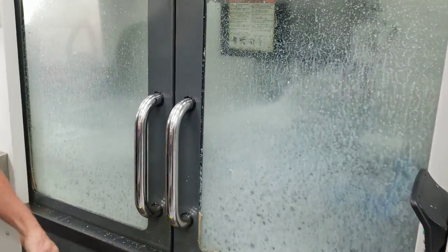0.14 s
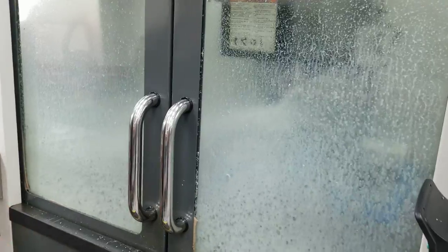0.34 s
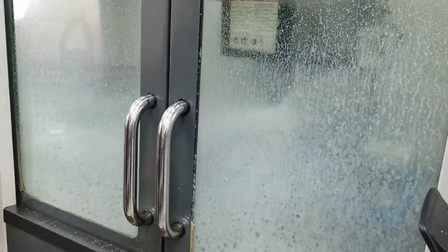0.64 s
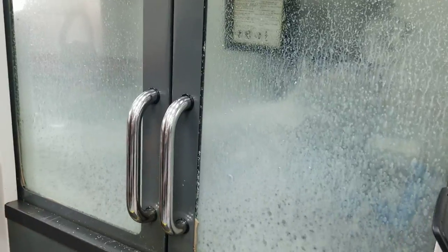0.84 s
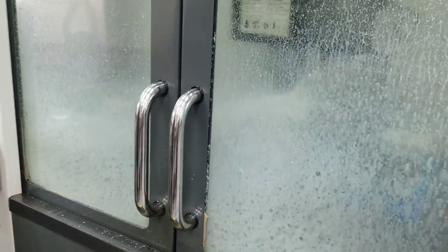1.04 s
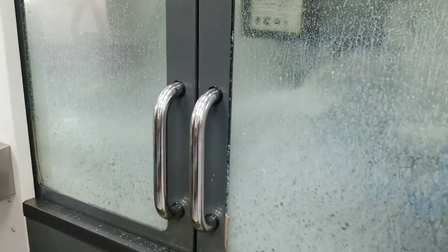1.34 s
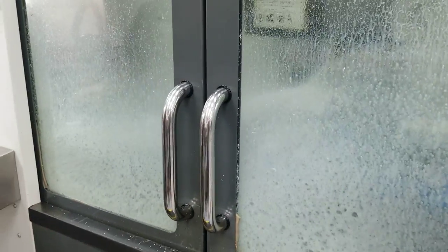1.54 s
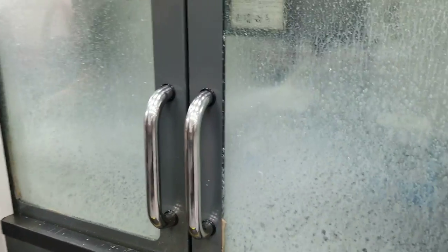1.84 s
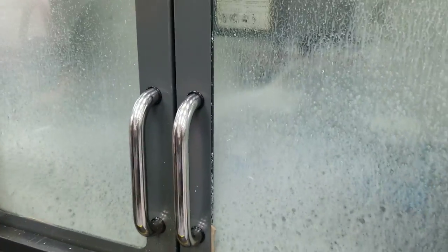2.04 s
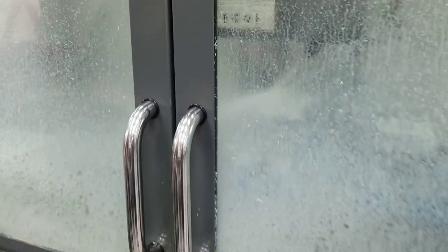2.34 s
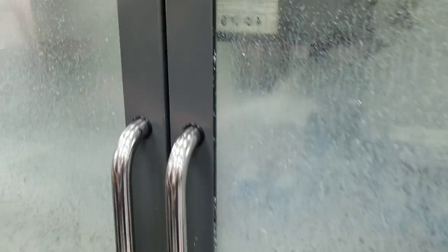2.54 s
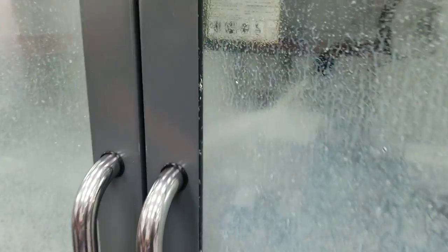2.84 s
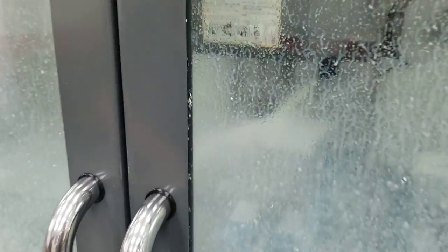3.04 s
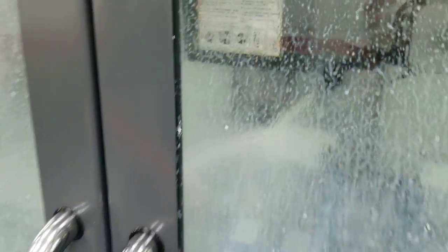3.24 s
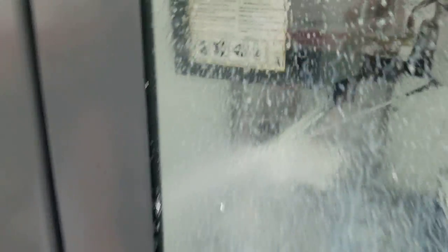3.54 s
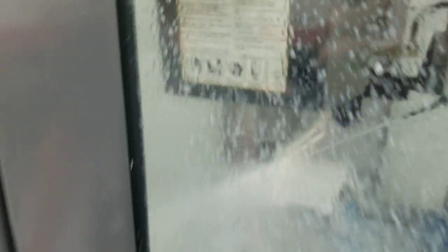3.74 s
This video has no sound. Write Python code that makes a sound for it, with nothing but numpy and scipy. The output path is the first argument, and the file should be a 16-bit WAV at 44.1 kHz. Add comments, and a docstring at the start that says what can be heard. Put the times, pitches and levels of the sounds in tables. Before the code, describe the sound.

A milling cutter whines shrilly on metal, eases, then bites again under hissing coolant spray

```python
"""A five-flute cutter mills metal at about 8000 rpm in a machining centre, under a pump hum.
At first tooth strikes make tool and stock whine, with a buzz and a rasp from run-out and unequal teeth.
Coolant, made of shaped noise, washes and hisses throughout; a feed drive tone swells around 1 s.
From about 1.3 s the cut eases. After 2.5 s it bites again, hum and hiss rise, and the buzz sinks.
Cutting tones are sines locked to the spindle; pump and feed drive tones keep their own pitch."""
import sys
import numpy as np
from scipy import signal
from scipy.fft import rfft, irfft
from scipy.io import wavfile
from scipy.ndimage import uniform_filter1d, minimum_filter1d

SR = 44100
rng = np.random.default_rng(int(sys.argv[2]) if len(sys.argv) > 2 else 0)


def master_out(mix):
    """Clip the mix to full scale and print it as 16-bit PCM to the path in sys.argv[1]."""
    frames = np.transpose(np.atleast_2d(mix))
    ceiling = np.clip(frames, -1, 1)
    pcm = np.round(ceiling * 32767).astype(np.int16)
    wavfile.write(sys.argv[1], SR, pcm)


N = 171990  # length in samples, 3.9 s

SPINDLE_HZ, FLUTES = 133.4, 5  # mean turns a second; teeth on the cutter


def undb(db):
    """Turn decibels into a gain."""
    return 10 ** (np.asarray(db) / 20)


def curve(rows, axis=1):
    """Join one column of a time table with straight lines."""
    rows = np.array(rows, float)
    return np.interp(np.arange(N) / SR, rows[:, 0], rows[:, axis])


def colour(rows, hz):
    """Read the gain at any frequency from a table of frequencies and levels."""
    rows = np.array(rows, float)
    log_hz = np.log(np.maximum(hz, 1))
    return undb(np.interp(log_hz, np.log(rows[:, 0]), rows[:, 1]))


def shaped(noise, rows):
    """Filter noise to a spectrum, then bring it to an RMS of 1."""
    hz = np.arange(N // 2 + 1) * SR / N
    filtered = irfft(rfft(noise) * colour(rows, hz), N)
    return filtered / np.std(filtered)


def wander(rate):
    """Drift smoothly between random values, `rate` of them a second, with a spread of 1."""
    steps = rng.standard_normal(2048)
    drift = np.interp(np.arange(N) / SR * rate, np.arange(len(steps)), steps)
    drift = uniform_filter1d(drift, max(int(SR / rate / 2), 1))
    return (drift - drift.mean()) / drift.std()


def partial(angle, swell_db, swell_rate, flutter):
    """A sine, RMS 1 before its swell, with slow level drift [dB] and quick phase flutter [radians]."""
    swell = undb(swell_db * wander(swell_rate))
    return np.sqrt(2) * swell * np.cos(angle + flutter * wander(70))


# Whine on the 4th, 5th and 6th tooth harmonics: (time [s], level [dB])
WHINE_4TH = [(0.0, -16), (0.13, -15), (0.21, -23), (0.48, -14.5), (1.02, -20), (1.09, -10.5), (1.17, -10),
             (1.29, -36.5), (2.24, -35.5), (2.55, -11.5), (2.7, -23), (2.88, -14), (3.21, -17), (3.49, -13),
             (3.79, -17.5), (3.86, -26)]
WHINE_5TH = [(0.0, -16.5), (0.21, -7.5), (0.35, -12), (0.42, -26.5), (0.48, -16), (0.73, -33), (1.26, -22),
             (1.37, -32), (2.41, -34.5), (2.74, -25.5), (3.18, -21), (3.25, -30), (3.4, -17), (3.53, -20),
             (3.57, -11), (3.74, -11), (3.85, -28.5)]
WHINE_6TH = [(0.0, -28.5), (0.56, -17), (1.18, -20), (1.25, -35), (2.13, -41), (2.73, -25), (2.9, -33),
             (3.24, -15), (3.29, -26), (3.37, -13), (3.73, -20), (3.9, -27)]
# Higher tooth harmonics: (multiple of the tooth rate, level before the bite is added [dB])
HIGH_HARMONICS = [(7, -33), (8, -34), (9, -44.5), (10, -45.5), (11, -48), (12, -53), (13, -54)]
# How hard the edges bite, for the higher harmonics and the rasp: (time [s], level change [dB])
BITE_LEVEL = [(0, 1), (1.18, -2.5), (1.32, -9.5), (2.3, -11.5), (3.15, 5.5), (3.35, 1), (3.7, 2.5),
              (3.9, -9)]


def whine(turn, lag):
    """Tooth strikes ring the tool strongly on three harmonics; the higher ones follow the bite."""
    out = 0
    for k, rows in enumerate((WHINE_4TH, WHINE_5TH, WHINE_6TH), 4):
        line = k * FLUTES
        tone = partial(line * turn + lag[line], swell_db=1.37, swell_rate=30, flutter=0.056)
        out = out + undb(curve(rows)) * tone
    bite = undb(curve(BITE_LEVEL))
    for k, db in HIGH_HARMONICS:
        line = k * FLUTES
        tone = partial(line * turn + lag[line], swell_db=3, swell_rate=8, flutter=.15)
        out = out + bite * undb(db) * tone
    return out


# Rasp between tooth harmonics: (frequency [Hz], level of a line before bite and overall cut [dB])
RASP_SPECTRUM = [(2500, -32.5), (3450, -33), (4400, -33.5), (6200, -48.5), (7600, -53.5), (9000, -71)]


def rasp(turn, lag):
    """Unequal teeth add lines at multiples of the spindle rate, which come and go as the cut moves on."""
    out = 0
    for k in range(19, 67):
        if k % FLUTES:  # leave out the tooth harmonics
            tone = partial(k * turn + lag[k], swell_db=4, swell_rate=6, flutter=0.33)
            out = out + colour(RASP_SPECTRUM, k * SPINDLE_HZ) * tone
    return out * undb(curve(BITE_LEVEL) - 6.0)


# Lines that flare up for a moment:
# (middle [s], multiple of the spindle rate, length at half height [s], level at the middle [dB])
FLARES = [(.03, 8, 0.5, -28), (.15, 3, 0.62, -31.5), (0.216, 15, 0.18, -29), (.56, 28, 0.37, -33),
          (.6, 33, .5, -33.5), (0.627, 26, 0.26, -24.5), (.72, 55, .25, -42.5), (.82, 29, 0.33, -22),
          (0.97, 24, 0.16, -22), (0.99, 26, 0.15, -24), (0.998, 50, 0.43, -47), (1.05, 4, 1.45, -31),
          (1.066, 45, 0.096, -39), (1.076, 15, 0.14, -30), (1.14, 60, .12, -44), (1.16, 23, 0.1, -25.5),
          (1.22, 55, .16, -39.5), (1.363, 21, 0.126, -28), (1.723, 21, 0.54, -30), (2.15, 6, 0.66, -37),
          (3.13, 59, 0.18, -38.5), (3.15, 22, 0.12, -28), (3.158, 23, .14, -29), (3.144, 35, 0.27, -26),
          (3.558, 15, 0.099, -31.5), (3.656, 45, 0.18, -31), (3.67, 55, 0.21, -34), (3.82, 31, 0.13, -23.5)]


def side_tones(turn, lag):
    """Single lines flare up as the stock rings: rough beside the whine, a bright squeal above it."""
    t = np.arange(N) / SR
    out = 0
    for middle, k, length, db in FLARES:
        flare = undb(db) / (1 + (2 * (t - middle) / length) ** 4)
        angle = k * turn + lag[k] + np.pi / 2
        out = out + flare * partial(angle, swell_db=2, swell_rate=12.53, flutter=0.14)
    return out


# Drone at the tooth rate, and at its octave: (time [s], level [dB])
TOOTH_DRONE = [(.4, -26.5), (.75, -37.5), (1.2, -24.5), (2.1, -36.5), (2.6, -45), (3.1, -39.5)]
TOOTH_OCTAVE = [(0, -24.5), (1.08, -28), (1.33, -46), (1.5, -33.5), (2.05, -35.5), (2.4, -32.5), (2.8, -39)]
# Buzz of stock and fixture: (multiple of the spindle rate, level before the time curve is added [dB])
BUZZ_LINES = [(1, -40.5), (3, -35), (4, -33.5), (6, -34), (7, -37), (8, -39), (9, -40), (11, -43),
              (13, -38), (15, -36.5), (16, -42.5)]
# Buzz over time: (time [s], level change below the split [dB], level change from the split up [dB])
BUZZ_OVER_TIME = [(0, 0, 2.5), (.7, -3.5, -1), (1.3, -2, -2), (1.8, -2, -0.5), (2.8, -9.5, -9),
                  (3.9, -16, -19)]
BUZZ_SPLIT_HZ = 1000


def buzz(turn, lag):
    """The teeth drone, and the longest one knocks the stock once a turn."""
    low = undb(curve(BUZZ_OVER_TIME, axis=1))
    high = undb(curve(BUZZ_OVER_TIME, axis=2))
    out = 0
    for k, rows in enumerate((TOOTH_DRONE, TOOTH_OCTAVE), 1):
        line = k * FLUTES
        tone = partial(line * turn + lag[line], swell_db=1.47, swell_rate=7.7, flutter=0.069)
        out = out + undb(curve(rows)) * tone
    for k, db in BUZZ_LINES:
        angle = k * turn + lag[k]
        if k * SPINDLE_HZ < BUZZ_SPLIT_HZ:
            out = out + low * undb(db) * partial(angle, swell_db=3, swell_rate=4.32, flutter=0.03)
        else:
            out = out + high * undb(db) * partial(angle, swell_db=6, swell_rate=3.95, flutter=0.082)
    return out


# Colour of the wash on the enclosure: (frequency [Hz], relative level per Hz [dB])
WASH_SPECTRUM = [(20, -26), (55, -12), (95, -13), (170, -4), (600, 1.5), (2200, -1), (8000, -15),
                 (15500, -41)]
# Wash over time: (time [s], level [dB])
WASH_OVER_TIME = [(2.2, -31), (2.8, -27), (3.9, -30.5)]
# Colour of the hiss of spray and chips: (frequency [Hz], relative level per Hz [dB])
HISS_SPECTRUM = [(1000, -29.5), (2200, -9.5), (2800, -2), (4500, 1), (6500, -13), (11000, -27.5),
                 (15500, -36)]
# Hiss over time, before its flicker: (time [s], level [dB])
HISS_OVER_TIME = [(0, -23.5), (.8, -25.5), (2.2, -26.5), (2.65, -20.5), (3.1, -20), (3.5, -22.5)]


def coolant(turn, chop=0.063, drop_db=3, flicker_db=0.76):
    """Dense drops of uneven strength wash the panels; the hiss at the cutter is chopped once a turn."""
    drops = rng.standard_normal((2, N)) * undb(drop_db * rng.standard_normal((2, N)))
    wash = shaped(drops[0], WASH_SPECTRUM) * undb(curve(WASH_OVER_TIME))
    chopped = drops[1] * (1 + chop * np.cos(turn))
    hiss_db = curve(HISS_OVER_TIME) + flicker_db * wander(35.15)
    hiss = shaped(chopped, HISS_SPECTRUM) * undb(hiss_db)
    return wash + hiss


# Feed drive over time: (time [s], level before each line's own is added [dB])
FEED_OVER_TIME = [(.6, -53), (.9, -37), (1.4, -39.5), (1.8, -65)]
# Feed drive harmonics: (multiple of the feed tone, relative level [dB])
FEED_HARMONICS = [(1, -4), (2, -8), (3, -2)]
# Pump hum: (time [s], level [dB])
PUMP_OVER_TIME = [(0, -36), (1.2, -49.5), (2.1, -47.5), (2.7, -36)]
FEED_HZ, PUMP_HZ = 500.3, 119.7


def motors():
    """The coolant pump hums on one steady pitch; the feed drive adds a passing tone with harmonics."""
    angle = 2 * np.pi * np.arange(N) / SR  # one cycle a second
    feed = 0
    for k, db in FEED_HARMONICS:
        feed = feed + undb(db) * partial(k * FEED_HZ * angle, swell_db=1.0, swell_rate=4.8, flutter=.05)
    pump = partial(PUMP_HZ * angle, swell_db=2.0, swell_rate=5.02, flutter=.02)
    return feed * undb(curve(FEED_OVER_TIME)) + pump * undb(curve(PUMP_OVER_TIME))


SPEED_WANDER = 0.00032  # spread of the spindle speed, as a fraction
IN_STEP_LINES = 7  # lines below this multiple of the spindle rate arrive nearly together, as one knock
TOP_HZ = 15700  # upper edge of the sound


def scene():
    """All sound comes from straight ahead; low lines arrive in step, high ones scattered."""
    speed = SPINDLE_HZ * (1 + SPEED_WANDER * wander(3.966))
    turn = 2 * np.pi * np.cumsum(speed) / SR  # spindle angle in radians
    lines = np.arange(int(TOP_HZ / SPINDLE_HZ))
    lag = rng.standard_normal(len(lines)) * (lines / IN_STEP_LINES) ** 2  # radians
    cutting = whine(turn, lag) + rasp(turn, lag) + side_tones(turn, lag) + buzz(turn, lag)
    mono = cutting + coolant(turn) + motors()
    return np.array([mono, mono])


LIMIT_S = .004  # limiter window, and the fade-in at the start


def record(dry):
    """A quick limiter holds down peaks above full scale; the highest treble is cut."""
    size = int(LIMIT_S * SR)
    needed = 1 / np.maximum(np.abs(dry), 1)
    gain = uniform_filter1d(minimum_filter1d(needed, size), size)
    gain = gain * np.minimum(np.arange(N) / size, 1)  # opens softly
    low_pass = signal.ellip(10, .1, 80, TOP_HZ, fs=SR, output="sos")
    return signal.sosfilt(low_pass, dry * gain)


dry = scene()
out = record(dry)
master_out(out)
```